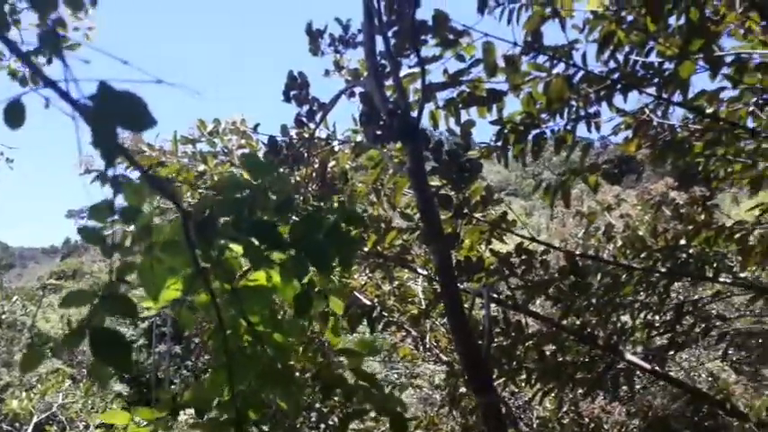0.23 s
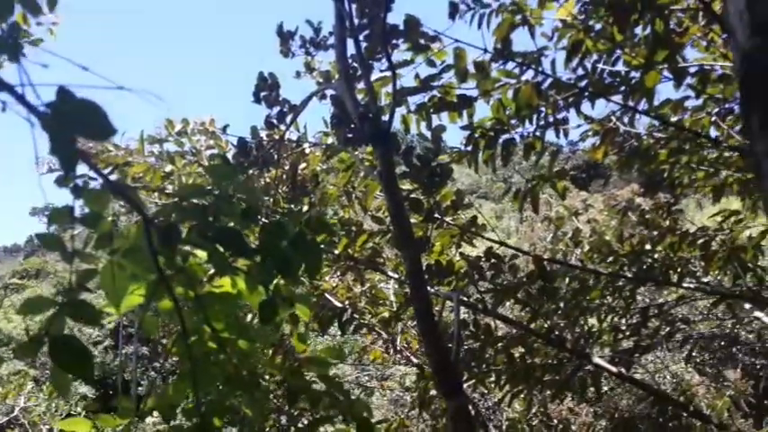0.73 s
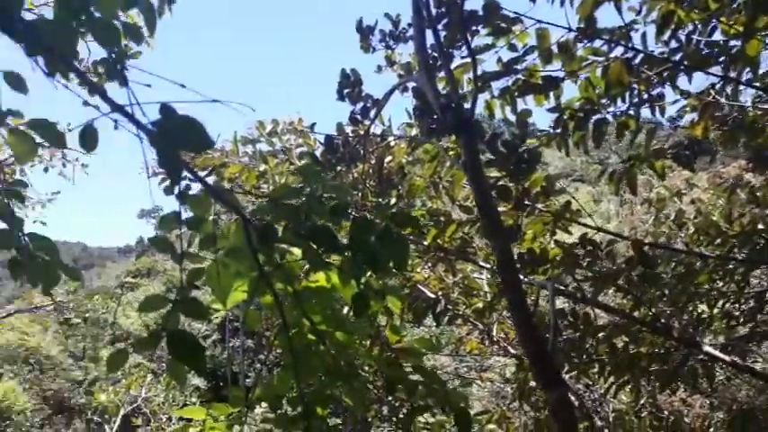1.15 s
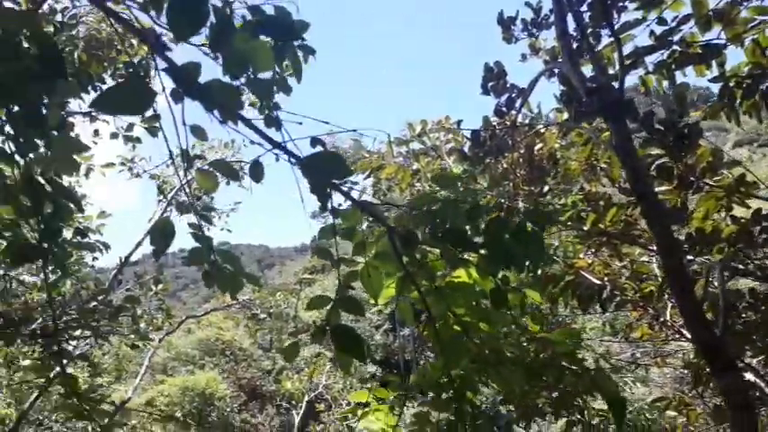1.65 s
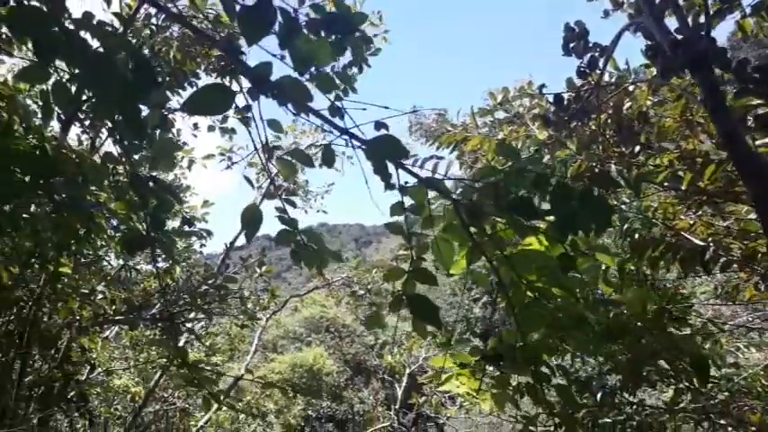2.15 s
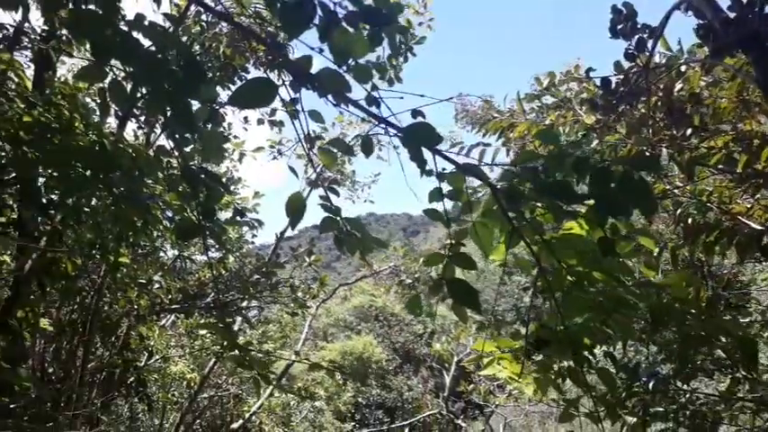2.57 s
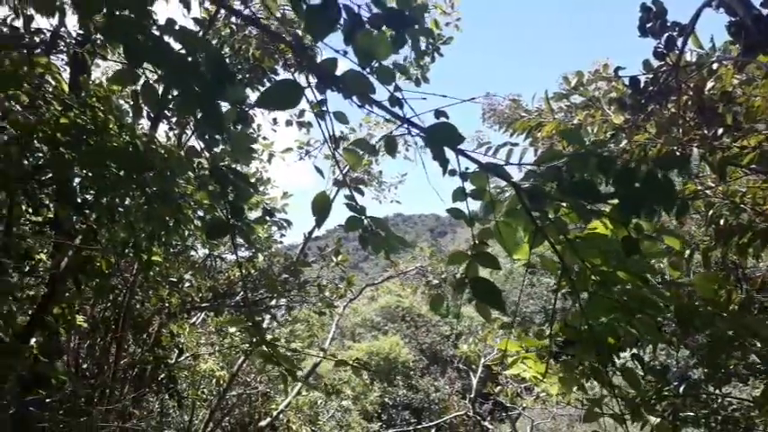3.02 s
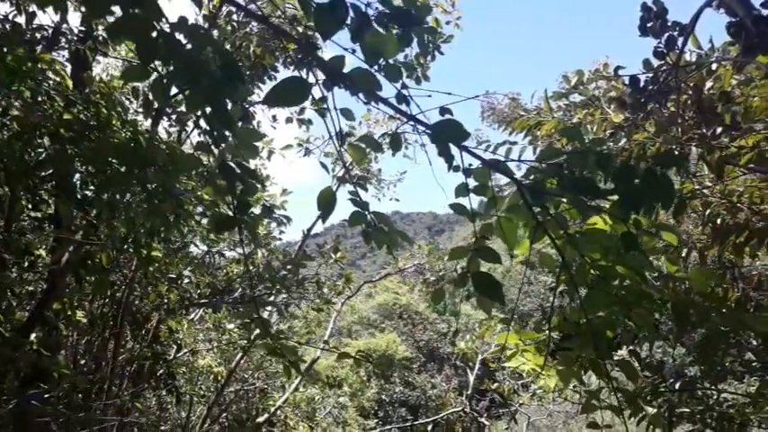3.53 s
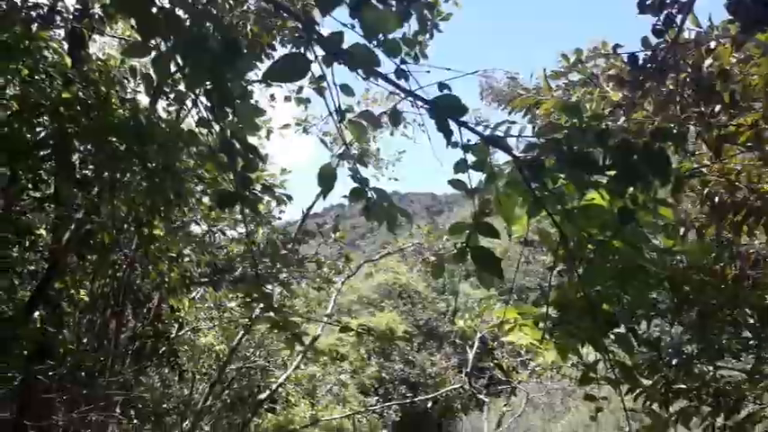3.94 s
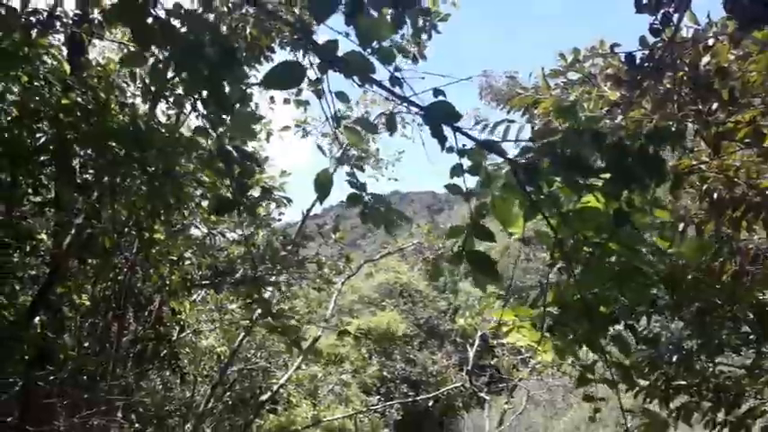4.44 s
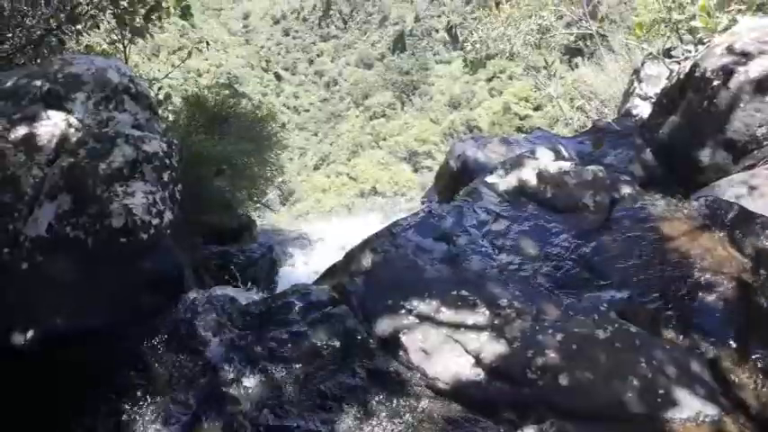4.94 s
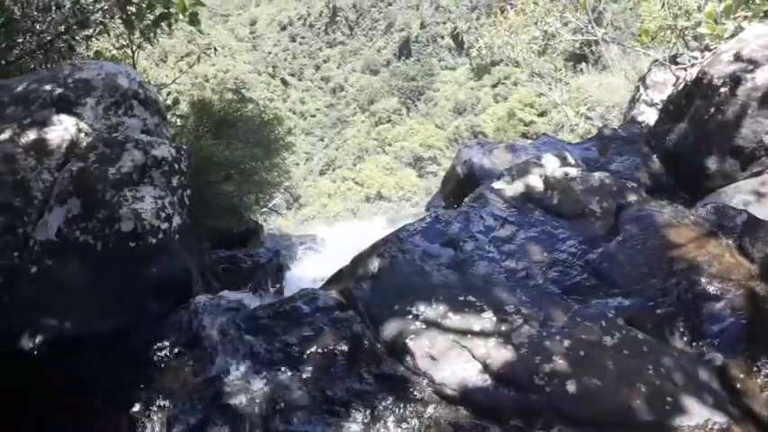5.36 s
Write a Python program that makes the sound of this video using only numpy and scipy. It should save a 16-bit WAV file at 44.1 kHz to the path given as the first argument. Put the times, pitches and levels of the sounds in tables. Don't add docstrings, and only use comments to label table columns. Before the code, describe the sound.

Outdoors, an even, quiet water rush over rocks, hissing on top and gurgling below, dotted with bubbles and faint snapping drops. An abrupt cut with a tiny gap brings the full pour of a nearby waterfall: broad rough froth and spray, swelling quickly at first, with brief hollow watery rings and wind buffeting the microphone in growing bursts until the end. Centred mono sound.

```python
import sys
import numpy as np
from scipy import signal
from scipy.fft import rfft, irfft, next_fast_len
from scipy.io import wavfile
from scipy.ndimage import uniform_filter1d, map_coordinates

SR = 44100
rng = np.random.default_rng(int(sys.argv[2]) if len(sys.argv) > 2 else 0)


def materialize(psi):
    bounded = np.clip(np.atleast_2d(psi).T, -1, 1)
    quanta = np.round(bounded * 32767).astype(np.int16)
    wavfile.write(sys.argv[1], SR, quanta)


def volts_from_db(level):
    exponent = np.asarray(level, float) / 20
    return 10 ** exponent


N = 246518

# time in seconds, level in dB.
STREAM_FLOW = [(0.0, -38), (0.39, -37.5), (0.63, -37.5), (1.26, -37), (1.59, -38.5), (1.91, -36.5),
               (2.31, -38.5), (2.79, -37), (3.4, -37.5), (3.88, -37), (4.18, -37), (4.51, -36.5)]
# frequency in Hz, density in dB per Hz.
STREAM_DEEP = [(15, -55), (25, -10), (43, -21.5), (92, -12.5), (172, -3), (257, -1), (348, -7),
               (400, -11.5), (520, -34), (880, -120)]
STREAM_BODY = [(190, -37), (330, -11), (408, -8.5), (496, -3.5), (690, -1.5), (767, -3.5), (975, 0.5),
               (1160, -2), (1900, -3.5), (2300, -9.5), (2750, -19.5), (3500, -70)]
STREAM_SPRAY = [(1590, -25), (2700, -7), (3400, -1), (4190, 0), (5190, -3), (7000, -11.5), (9100, -36),
                (15400, -120)]
STREAM_MIST = [(4120, -40), (7000, -8.5), (8780, 0), (10000, -8), (12900, -8.5), (14800, -8.5), (15750, -5)]
# start in seconds, peak in dB, pitch in Hz.
DROPS = [(.246, -44, 13000), (1.176, -38, 9000), (1.177, -42, 14500), (1.491, -42, 12000),
         (1.562, -41, 14500), (1.573, -42, 14500), (1.656, -46, 9000), (2.354, -43, 9000),
         (2.585, -39, 5800), (2.6, -44, 13500), (2.673, -36, 6100), (3.639, -42, 9000), (3.828, -41, 9400),
         (3.92, -43, 14500)]
# start in seconds, pitch in Hz.
PLOPS = [(0.291, 988), (0.321, 966), (0.385, 972), (0.79, 1700), (1.091, 988), (1.635, 1140), (2.103, 988),
         (2.575, 1080), (3.14, 1030), (3.17, 1280), (3.5, 1070), (3.704, 1490), (3.746, 1050), (3.98, 953),
         (4.157, 972), (4.287, 956)]
# start in seconds, peak in dB, pitch in Hz.
GLUGS = [
    (0.413, -38, 248),
    (1.27, -36, 183),
    (1.788, -40, 226),
    (2.277, -39, 170),
    (3.253, -42, 347),
    (3.905, -35, 288),
    (4.248, -39, 256),
    (4.328, -38, 229),
]
# frequency in Hz, density in dB per Hz.
FALLS_BODY = [(190, -23), (330, -0.5), (404, -3.5), (561, -7), (635, -3), (824, -4), (899, 0), (990, -4.5),
              (1140, -2), (1820, -1), (3300, -8.5), (4290, -28), (7260, -120)]
FALLS_SPRAY = [(1650, -4), (2800, -8), (3900, -4), (6280, -12), (7860, -12), (8820, -9.5), (10200, -17),
               (15100, -16), (15750, -11)]
# centre in seconds, pressure in dB, half length in ms.
PUFFS = [(4.5567, -9, 1.2), (4.569, -11, 1.6), (4.6628, -10, .8), (4.709, -9, .7), (4.724, -10, 1.2),
         (4.8763, -7, 2), (4.8836, -7, 1), (4.9056, -3, 1), (4.9165, -7, 1), (4.923, -9, 1.2),
         (5.0546, -10, 1), (5.0617, -7, 2.5), (5.234, 2, 1.2), (5.244, -7, 1.6), (5.3064, -8, 1.6),
         (5.3312, -9, 1.6), (5.3435, -1, 2.2), (5.3554, -9, .8), (5.449, -1.5, 1.6), (5.4578, -6, 2.5),
         (5.4724, -5, 2.5), (5.4766, 6.5, 1.2), (5.4846, 0, 2), (5.5011, 0, 1), (5.5085, -8, .5),
         (5.5127, -1, 1), (5.5407, 0, 1), (5.5488, -8, 1.6), (5.5613, -1, 1), (5.575, -7, 1)]
# start in seconds, peak in dB, pitch in Hz.
HOLLOWS = [
    (4.985, -25, 640),
    (5.465, -18, 555),
    (5.562, -20, 700),
]

STREAM_END_S, FALLS_START_S = 4.516, 4.5543
TOP_HZ, BASS_CUT_HZ = 16200, 40
DEEP_DB, DEEP_FOLLOWS = -50.5, 1.4
SPRAY_DB, SPRAY_FOLLOWS = -47, 0.4
MIST_DB, MIST_DB_PER_S = -54.5, 0.5
PLOP_DB = -26.5
FALLS_DB, FALLS_SPRAY_DB = -24, -30
SETTLE_DB, SETTLE_S = -3.5, 0.24
CALM_DB, GUST_DB, GUST_S = -34.5, -29.5, 0.062
PORT_LOW_CUT_HZ = 200

TIME_S = np.arange(N) / SR


def unit(x):
    return x / np.sqrt(np.mean(x ** 2) + 1e-20)


def wobble(knots_per_s):
    knots = rng.standard_normal(int(N * 40 / SR) + 9)
    return map_coordinates(knots, [np.arange(N) * knots_per_s / SR])


def coloured(x, spectrum):
    z = rfft(x, next_fast_len(N + 8192))
    hz, db = np.transpose(spectrum)
    grid_hz = np.linspace(1, SR / 2, len(z))
    even = z / np.sqrt(uniform_filter1d(abs(z) ** 2, size=3000) + 1e-9)
    gain_db = np.interp(np.log(grid_hz), np.log(hz), db, -120, -120)
    return unit(irfft(even * volts_from_db(gain_db))[:N])


def hiss(patchy_db):
    z = signal.stft(rng.standard_normal(N + 512), nperseg=512)[2]
    field = uniform_filter1d(rng.standard_normal(z.shape), size=5, axis=0)
    field = uniform_filter1d(field, size=8, axis=1)
    patched = z * volts_from_db(patchy_db * unit(field))
    return unit(signal.istft(patched, nperseg=512)[1][:N])


def bubbles(start_s, hz, db, cycles, rise, size):
    turns = np.arange(size) / SR * np.reshape(hz, (-1, 1))
    envelope = volts_from_db(-20 * turns / cycles) * (1 - np.exp(-turns / 0.8))
    tone = np.sin(2 * np.pi * turns * (1 + rise * turns / cycles))
    wave = volts_from_db(db)[:, None] * envelope * tone
    at = (np.asarray(start_s) * SR).astype(int)[:, None] + np.arange(size)
    return np.bincount(at.ravel(), wave.ravel(), N + size)[:N]


def froth(low_hz, high_hz, cycles, spread_db, count, size):
    when, pitch, luck = rng.random((count, 3)).T
    hz = low_hz * (high_hz / low_hz) ** pitch
    db = 20 * np.log10(hz) - spread_db * np.log(luck + 3e-3)
    return unit(bubbles(when * N / SR, hz, db, cycles, rise=0.1, size=size))


def water(flow_db, spray_db, body, spray, bubbly, crackly):
    surge = wobble(7.08)
    rush = hiss(patchy_db=0.7)
    rush = rush + bubbly * froth(400, 3000, cycles=9, spread_db=2.2, count=12000, size=400)
    fizz = hiss(patchy_db=1.1)
    fizz = fizz + crackly * froth(3000, 15000, cycles=2.5, spread_db=2.8, count=15000, size=48)
    rush_db = flow_db + 0.3 * surge + 0.2 * wobble(25)
    fizz_db = spray_db + 0.33 * surge + 0.78 * wobble(30)
    return volts_from_db(rush_db) * coloured(rush, body) + volts_from_db(fizz_db) * coloured(fizz, spray)


def stream():
    flow_db = np.interp(TIME_S, *np.transpose(STREAM_FLOW))
    swing_db = flow_db - flow_db.mean()
    spray_db = SPRAY_DB + SPRAY_FOLLOWS * swing_db
    events = plops() + glugs() + drops()
    edges = gurgle(swing_db) + mist()
    flow = water(flow_db, spray_db, STREAM_BODY, STREAM_SPRAY, bubbly=0.37, crackly=0.48)
    return events + edges + flow


def gurgle(swing_db):
    return volts_from_db(DEEP_DB + DEEP_FOLLOWS * swing_db) * coloured(hiss(patchy_db=1.4), STREAM_DEEP)


def mist():
    sizzle = hiss(patchy_db=1.2)
    sizzle = sizzle + 0.6 * froth(6000, 16000, cycles=2.5, spread_db=2.7, count=15000, size=24)
    level_db = MIST_DB + MIST_DB_PER_S * TIME_S + 0.54 * wobble(27.7)
    return volts_from_db(level_db) * coloured(sizzle, STREAM_MIST)


def drops():
    x = np.zeros(N)
    decay_db = -60 * np.arange(400) / SR / 0.02
    for start_s, db, hz in DROPS:
        band = signal.butter(2, [hz * 0.8, min(hz * 1.4, TOP_HZ)], "band", fs=SR, output="sos")
        burst = volts_from_db(db + 1 + decay_db) * rng.standard_normal(400)
        x[round(start_s * SR):][:400] += signal.sosfilt(band, burst)
    return x


def plops():
    start_s, hz = np.transpose(PLOPS)
    return bubbles(start_s, hz, np.full(len(hz), PLOP_DB), cycles=13, rise=0.03, size=900)


def glugs():
    start_s, db, hz = np.transpose(GLUGS)
    return bubbles(start_s, hz, db + 1, cycles=9, rise=0.02, size=3000)


def falls():
    settle_db = SETTLE_DB * np.exp(-np.maximum(TIME_S - FALLS_START_S, 0) / SETTLE_S)
    pour = water(FALLS_DB + settle_db, FALLS_SPRAY_DB + settle_db,
                 FALLS_BODY, FALLS_SPRAY, bubbly=0.3, crackly=0.35)
    return pour + wind() + hollows()


def wind():
    push, t_s = np.zeros(N + 500), np.arange(-500, 500) / SR
    gust = np.zeros(N)
    for centre_s, db, half_ms in PUFFS:
        pulse = np.exp(-0.5 * (t_s * 1000 / half_ms) ** 2)
        push[round(centre_s * SR) - 500:][:1000] += volts_from_db(db + 0.6) * pulse
        gust += np.exp(-0.5 * ((TIME_S - centre_s) / GUST_S * 2) ** 2)
    when, luck = rng.random((3000, 2)).T
    weak = np.bincount((when * N).astype(int), volts_from_db(-2.5 * np.log(luck + 1e-2)), N)
    weak = np.convolve(weak, np.exp(-0.5 * (t_s / 0.00085) ** 2), "same")
    low_cut = signal.butter(1, PORT_LOW_CUT_HZ, "high", fs=SR)
    strong_thumps = signal.lfilter(*low_cut, push[:N])
    weak_thumps = unit(signal.lfilter(*low_cut, weak - weak.mean()))
    weak_gain = volts_from_db(CALM_DB) + volts_from_db(GUST_DB) * gust / gust.max()
    return strong_thumps + weak_gain * weak_thumps


def hollows():
    start_s, db, hz = np.transpose(HOLLOWS)
    return bubbles(start_s, hz, db - 2, cycles=40, rise=0.004, size=5000)


def scene():
    at_stream = TIME_S < (STREAM_END_S + FALLS_START_S) / 2
    x = stream() * at_stream + falls() * (TIME_S > FALLS_START_S)
    return np.array([x, x])


def low_pass(x):
    return signal.sosfilt(signal.butter(12, 15910, fs=SR, output="sos"), x)


def record(dry):
    top = signal.butter(12, TOP_HZ, fs=SR, output="sos")
    bass = signal.butter(2, BASS_CUT_HZ, "high", fs=SR, output="sos")
    heard = signal.sosfiltfilt(bass, signal.sosfilt(top, dry))
    kept = (TIME_S < STREAM_END_S) | (TIME_S > FALLS_START_S)
    return low_pass(heard * kept)


dry = scene()
out = record(dry)
materialize(out)
```